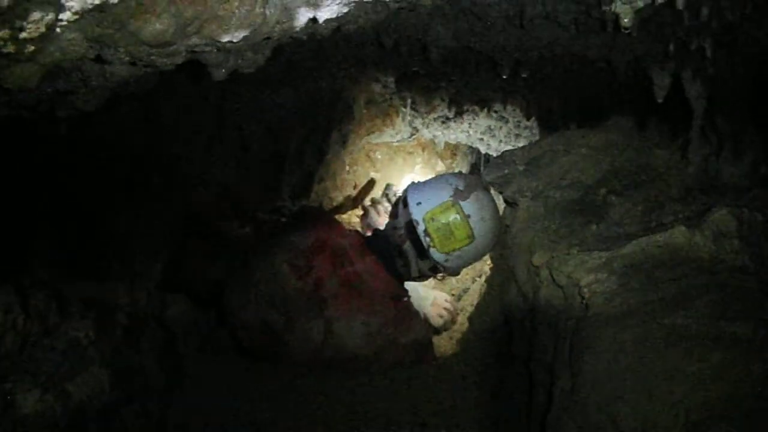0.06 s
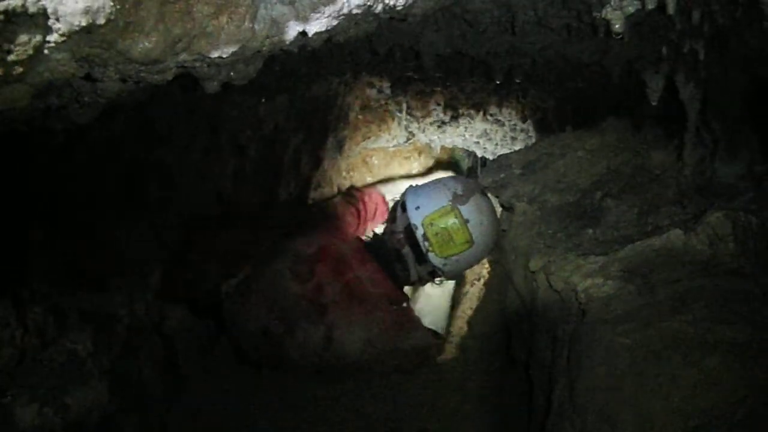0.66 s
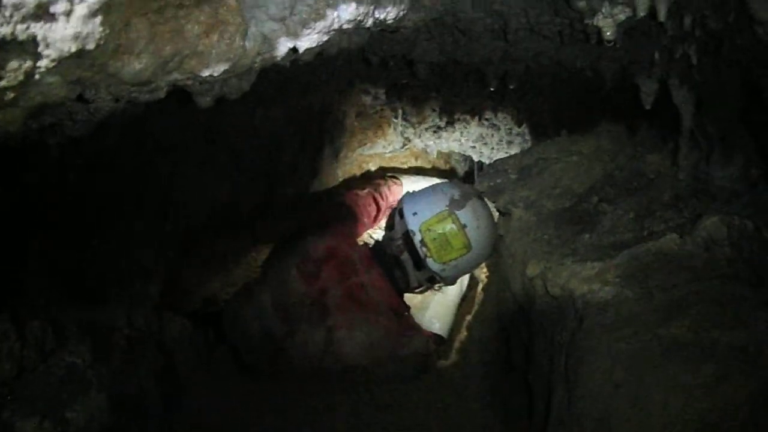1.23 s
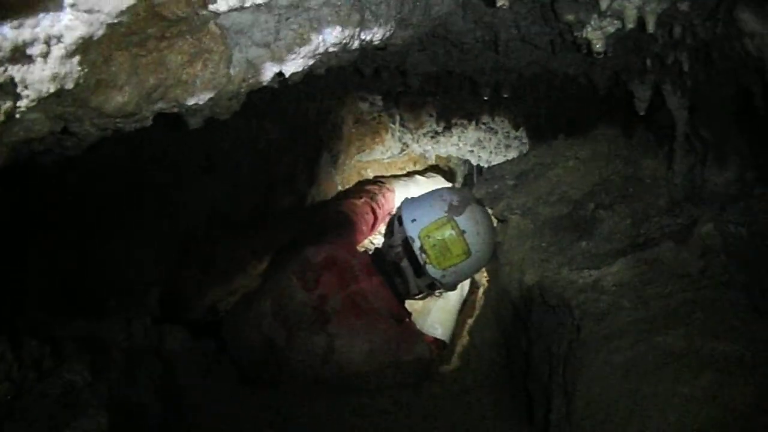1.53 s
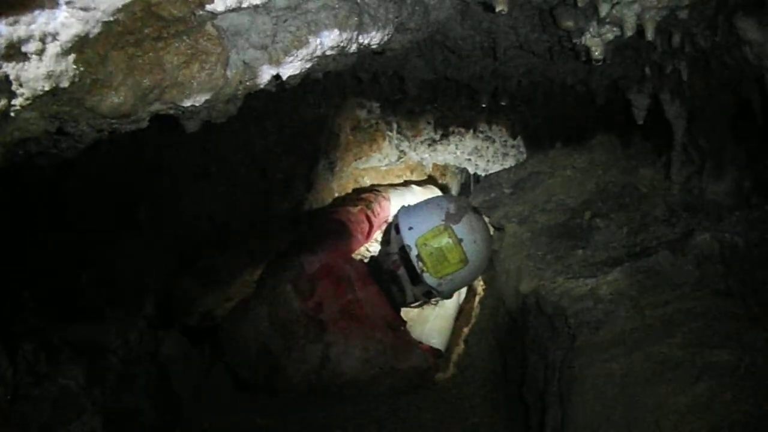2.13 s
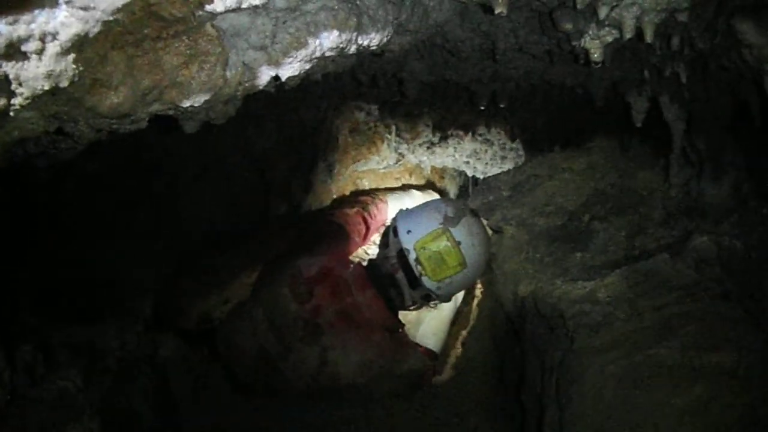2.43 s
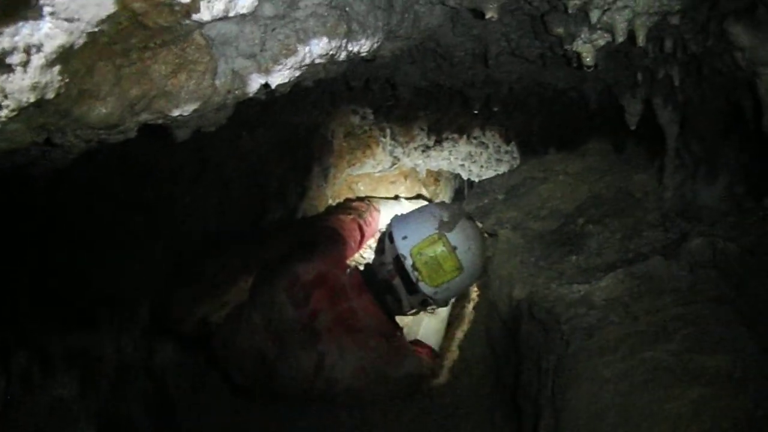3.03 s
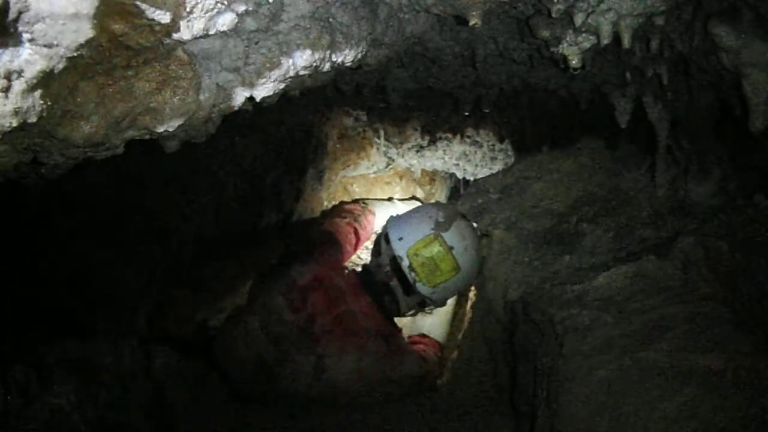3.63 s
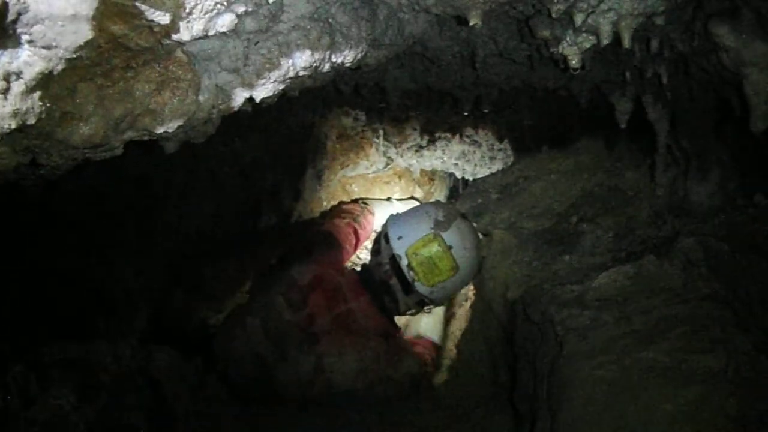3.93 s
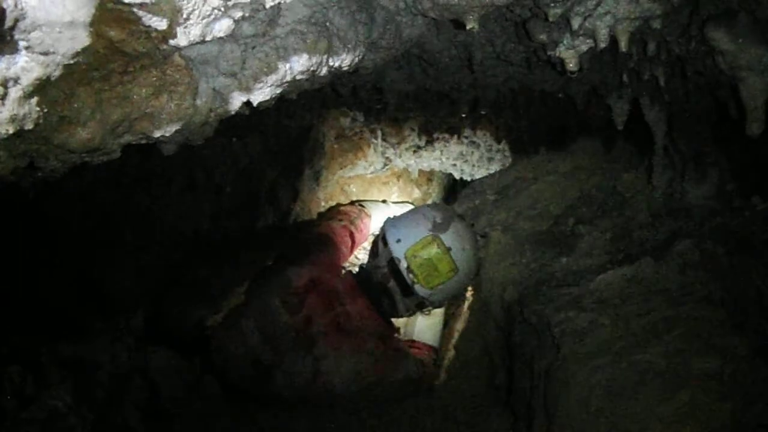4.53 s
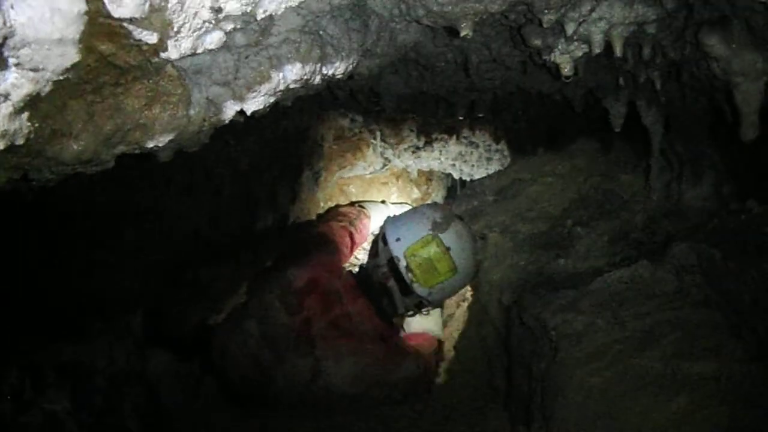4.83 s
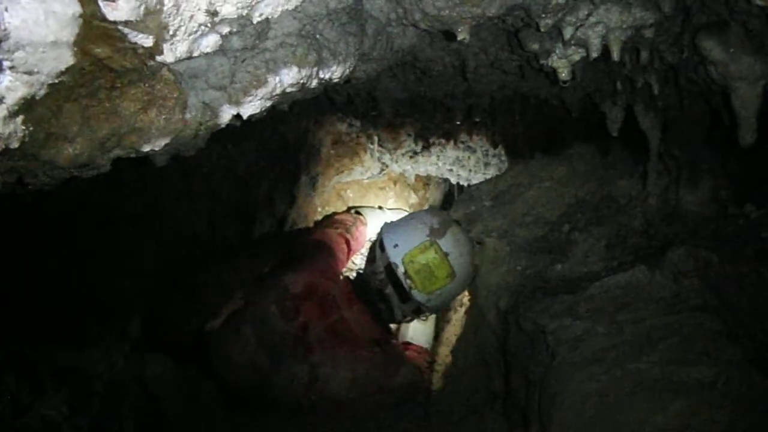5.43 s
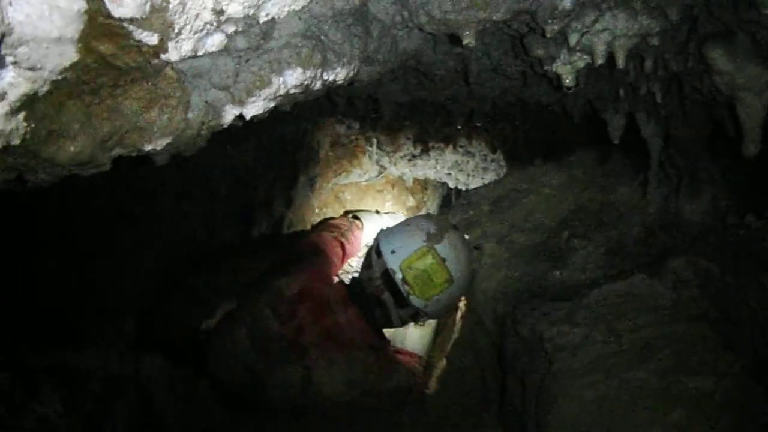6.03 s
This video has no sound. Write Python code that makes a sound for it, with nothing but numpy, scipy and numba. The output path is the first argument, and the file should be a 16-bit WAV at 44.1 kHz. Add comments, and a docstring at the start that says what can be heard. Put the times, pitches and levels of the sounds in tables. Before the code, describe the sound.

A hammer strikes a steel chisel seven times in a narrow cave, after light clinks and clothing rustle, over faint hiss.

```python
"""A hammer strikes a steel chisel seven times in a narrow limestone passage: the steel rings, the rock
cracks and thuds, and the close walls thicken every blow and boom briefly. Before that the caver shifts
his arms and sets the chisel on the rock with a few clinks; his suit rustles on each backswing.
The camera hisses and whines, overloads on the blows and turns its gain down after each."""
import sys
import numpy as np
from scipy import signal
from scipy.fft import rfft, irfft, next_fast_len
from scipy.io import wavfile
from scipy.ndimage import map_coordinates
from numba import njit

SR = 44100
rng = np.random.default_rng(int(sys.argv[2]) if len(sys.argv) > 2 else 0)


def dump(signal):
    """Clip the signal to [-1, 1] and save it as 16-bit WAV at the path in sys.argv[1]."""
    limited = np.clip(np.atleast_2d(signal).T, -1, 1)
    pcm = np.round(limited * 32767).astype(np.int16)
    wavfile.write(sys.argv[1], SR, pcm)


N = 276507
SHOT = 16384  # samples in a one-shot
AGE = np.arange(SHOT) / SR


def amp(db):
    """Decibels to gain."""
    return 10 ** (np.asarray(db) / 20)


def burst(x):
    """Scale each row to the energy of 20 ms at rms 1."""
    return x / np.sqrt(np.sum(x ** 2, axis=-1, keepdims=True) / (.02 * SR) + 1e-20)


def along(points, hz):
    """Read (Hz, value) breakpoints on a log axis."""
    f, v = np.transpose(points)
    return np.interp(np.log(hz + 1), np.log(f), v)


def wobble(rate):
    """A smooth random modulator with rate knots a second."""
    return map_coordinates(rng.standard_normal(1024), [np.arange(N) * rate / SR], mode="mirror")


def noise(spectrum):
    """Steady noise of rms 1 with this spectrum."""
    size = next_fast_len(N + 8192)
    eq = amp(along(spectrum, np.fft.rfftfreq(size, 1 / SR)))
    x = irfft(rfft(rng.standard_normal(size)) * eq, size)[:N]
    return x / np.sqrt(np.mean(x ** 2) + 1e-20)


def pulse(spectrum, tilt_db=0):
    """The tightest causal transient with this spectrum, tilted by tilt_db an octave."""
    hz = np.fft.rfftfreq(SHOT, 1 / SR)
    cepstrum = irfft(np.log(amp(along(spectrum, hz) + tilt_db * np.log2(1 + hz / 100))))
    cepstrum[1:SHOT // 2] *= 2  # fold to minimum phase
    cepstrum[SHOT // 2 + 1:] = 0
    return irfft(np.exp(rfft(cepstrum)))


def add(track, s, sound):
    """Drop a one-shot into the track at time s."""
    start = round(s * SR)
    track[start:start + SHOT] += sound[:N - start]


# the passage's tight reverb: (frequency [Hz], t60 [s])
PASSAGE_DECAY = [(60, 0.33), (170, 0.08), (430, 0.043), (700, 0.072), (1100, 0.01), (1700, 0.092),
                 (3000, 0.073), (6000, 0.053), (10000, 0.061), (15000, 0.047)]
def walls(x, build_s=.005, first_share=.85, crowd_s=0.01):
    """The wet signal: reflections crowd in and hold the level briefly, then the bass lingers."""
    hz, t, grains = signal.stft(rng.standard_normal(SHOT), SR, nperseg=128)
    fading_s = np.hypot(t, crowd_s) - crowd_s
    decay = amp(-60 * fading_s / along(PASSAGE_DECAY, hz)[:, None])
    tail = signal.istft(grains * decay, SR, nperseg=128)[1][:SHOT]
    tail *= 1 - (1 - first_share) * np.exp(-AGE / build_s)
    return burst(irfft(rfft(x, 2 * SHOT) * rfft(tail, 2 * SHOT))[..., :SHOT])


# EQ of the noise bed: (frequency [Hz], level [dB])
HISS_EQ = [(12, -29.5), (20, 0), (83, -1.5), (119, -4), (153, -5), (191, -6.5), (298, -8.5), (465, -9),
           (725, -13.5), (2330, -17.5), (3960, -17.5), (10200, -22.5), (11400, -17.5), (12400, -23.5),
           (15500, -24.5)]
# the camera's electronics: (pitch [Hz], rms level [dB], wander [Hz])
WHINES = [(7897, -67, 51), (11724, -53, 15), (15720, -73, 10)]
def hiss_and_whine(hiss_db=-43, waver_db=4.0, jitter_hz=36):
    """A bed of hiss and rumble, with thin wavering whines from the camera."""
    track = amp(hiss_db) * noise(HISS_EQ)
    for hz, db, wander_hz in WHINES:
        pitch = hz + wander_hz * wobble(26) + jitter_hz * wobble(240)
        level = amp(db + waver_db * wobble(170))
        track += level * np.sqrt(2) * np.sin(2 * np.pi * np.cumsum(pitch) / SR)
    return track


def swell(peak_s, rise_s, fall_s):
    """The speed of one arm movement: a bell with its own rise and fall."""
    t = np.arange(N) / SR - peak_s
    return np.exp(-.5 * (t / np.where(t < 0, rise_s, fall_s)) ** 2)


# EQ of rubbing cloth: (frequency [Hz], level [dB])
CLOTH_EQ = [(200, -43), (1500, -13), (2800, -1.5), (4700, 7.5), (6500, 0), (9500, 0.5), (12000, -13),
            (15500, -34)]
# the arms reach and settle: (time [s], level [dB], half length [s])
REACHES = [(0.098, -45, 0.069), (0.737, -38, 0.11), (1.105, -45, 0.11), (1.424, -45.5, .13),
           (2.1, -50, 0.28)]
def sleeves(fidget_db=-59.5, flutter_db=1.7, backswing_lead_s=0.052):
    """The suit, never quite still, rustles with the speed of the arms on each reach and backswing."""
    moves = [amp(db) * swell(s, half_s, half_s) for s, db, half_s in REACHES]
    moves += [amp(db) * swell(s - backswing_lead_s, rise_s=.14, fall_s=0.089) for s, *_, db in BLOWS]
    level = np.sqrt(amp(fidget_db) ** 2 + sum(move ** 2 for move in moves))
    return level * amp(flutter_db * wobble(45)) * noise(CLOTH_EQ)


# scuffs on the wall: (time [s], level [dB], t60 [s], brightness [dB/octave])
SCUFFS = [(0.082, -38, 0.091, -1), (.174, -37.5, 0.0072, -3.5), (1.113, -41, 0.048, 5),
          (3.710, -40, 0.035, -12), (3.775, -32, 0.029, 5.5), (3.793, -34, 0.021, 7.5),
          (5.156, -32.5, 0.021, 4.5), (6.118, -33.5, .03, 9)]
def scuffs(roughness=0.51):
    """Grit and cloth scrape the wall in short showers of grains."""
    track = np.zeros(N)
    for s, db, t60, tilt_db in SCUFFS:
        grains = rng.standard_normal(SHOT) * np.exp(roughness * rng.standard_normal(SHOT))
        scrape = signal.fftconvolve(grains * amp(-60 * AGE / t60), pulse(CLOTH_EQ, tilt_db))[:SHOT]
        add(track, s, amp(db) * walls(scrape))
    return track


def ring(hz, db, t60, direct_db=-14):
    """Struck steel modes, a mix of direct sound and wall reflections."""
    modes = np.sin(2 * np.pi * np.outer(hz, AGE)) * amp(-60 * AGE / np.reshape(t60, (-1, 1)))
    signs = rng.choice([-1, 1], len(hz))
    return burst((signs * amp(db)) @ (walls(modes) + amp(direct_db) * burst(modes)))


# the chisel's modes: (pitch [Hz], loose level [dB], seated level [dB], loose t60 [s])
CHISEL_MODES = [(1556, -17, -20.5, 0.13), (2725, -7, -13.5, 0.11), (4026, 3, -23.5, 0.12),
                (4194, 3, -13, 0.053), (4173, -2.5, -15.5, 0.07), (4547, -0.5, -8.5, 0.025),
                (4965, -8, -5, 0.038), (5467, -28.5, -4.5, 0.036), (5816, -25, -1, 0.064),
                (6173, -33, -8.5, 0.031), (7203, -2, -15, 0.11), (7575, 0, -7.5, 0.11),
                (8010, -29, -8, 0.091), (9350, -32, -12.5, .07), (10100, -32.5, -13.5, .07),
                (10370, -20.5, -17.5, .07), (13700, -23, -27, .04)]
# EQs of the stone's bright crack and low thud: (frequency [Hz], level [dB])
CRACK_EQ = [(200, -34), (700, -25.5), (1100, -32), (1600, -5), (2300, -9), (3100, 8.5), (3600, -4),
            (5000, 6.5), (7000, 1), (9500, -3.5), (12000, -12), (16000, -27.5)]
THUD_EQ = [(20, -27.5), (70, -15.5), (140, -3.5), (240, -8), (360, 0), (520, 3.5), (680, -13), (950, -10.5),
           (2500, -36.5)]
def clink(tilt_db, sustain, tick_db=-17, knock_db=-17, detune=0.0043):
    """Held loosely, the chisel rings on after a light touch; the grip shifts its notes a little."""
    hz, loose_db, _, t60 = np.transpose(CHISEL_MODES)
    notes = hz * (1 + detune * rng.standard_normal(len(hz)))
    steel = ring(notes, loose_db + tilt_db * np.log2(hz), sustain * t60, direct_db=-4)
    stone = amp(tick_db) * walls(pulse(CRACK_EQ)) + amp(knock_db) * walls(pulse(THUD_EQ))
    return steel + stone


# light touches: (time [s], level [dB], brightness [dB/octave], sustain [x loose t60],
# bounces [rounded count, none if negative])
TOUCHES = [(1.413, -45, -28, .6, 0), (1.523, -34.5, -3, 0.85, -0.5), (1.608, -38.5, -2, 2, 0),
           (1.7384, -20, -8.5, .35, 0), (1.886, -24.5, -6.5, 0.65, 3), (2.197, -44.5, -9, 0.42, -0.5),
           (2.382, -37, -8, 0.65, 1.5), (2.496, -45.5, -14, 0.42, -0.5), (3.708, -39.5, -17.5, .3, -1),
           (6.101, -44, -15, 0.55, -0.5)]
def setting_chisel(flight_shrink=0.81, bounce_loss_db=3):
    """The chisel touches stone or hammer; some touches set off ever quicker, weaker bounces."""
    track = np.zeros(N)
    for s, db, tilt_db, sustain, bounces in TOUCHES:
        add(track, s, amp(db) * clink(tilt_db, sustain))
        flight_s = .076 + .00092 * db  # a harder touch flies longer and lands louder
        bounce_db = -28.5 + 0.35 * db
        for k in range(round(bounces)):
            s += flight_s * flight_shrink ** k
            # clear of the stone it rings brightly
            add(track, s, amp(bounce_db - bounce_loss_db * k) * clink(tilt_db=3, sustain=0.59))
    return track


def thump(spectrum, tilt_db, wet_db):
    """One dull push and the passage's answer."""
    push = burst(pulse(spectrum, tilt_db))
    return burst(push + amp(wet_db) * walls(push))


# EQ of a body hit: (frequency [Hz], level [dB])
BUMP_EQ = [(20, -26), (70, -13), (100, -15.5), (140, 1), (220, -13.5), (500, -14.5), (1200, -37),
           (5000, -57.5)]
# body hits: (time [s], level [dB], brightness [dB/octave])
BUMPS = [(2.987, -44, -1), (3.032, -28, -7), (3.098, -38, -21.5), (3.707, -28, 1)]
def body_bumps():
    """The caver's body bumps softly against the rock."""
    track = np.zeros(N)
    for s, db, tilt_db in BUMPS:
        add(track, s, amp(db) * thump(BUMP_EQ, tilt_db, wet_db=6))
    return track


# the air standing between the walls: (pitch [Hz], level [dB], t60 [s])
AIR_MODES = [(123.4, -16, 0.78), (170, -12.5, 0.25), (216, -10, 0.44), (300, -6.5, 0.083),
             (408, -2.5, 0.26), (494, -10.5, .17)]
def rock_thud(rock_hz, knock_db=-2, knock_decay_s=0.011, boom_db=-6.5):
    """A blow's low end: the rock under the tip knocks at its own pitch and the passage's air booms on."""
    knock = burst(np.sin(2 * np.pi * rock_hz * AGE) * AGE * amp(-60 * AGE / knock_decay_s))
    boom = sum(rng.choice([-1, 1]) * amp(db - 60 * AGE / t60) * np.sin(2 * np.pi * hz * AGE)
               for hz, db, t60 in AIR_MODES)
    return thump(THUD_EQ, 0, wet_db=3) + amp(knock_db) * knock + amp(boom_db) * burst(boom)


# hammer blows; how the tip sits in the rock sets the bending note and which overtone sings out:
# (time [s], level [dB], seating [0-1], crack [dB], thud [dB], rock pitch [Hz], bend pitch [Hz],
# bend [dB], overtone pitch [Hz], overtone [dB], rebound delay [s, 0 for none], backswing rustle [dB])
BLOWS = [(3.4249, -2.5, 0.29, -7, -54, 484, 2886, -28.5, 4613, 1.5, 0.0054, -53.5),
         (3.8539, 3.5, 0.94, -7, -35, 450, 2888, -6, 5365, 10.5, 0.0094, -54.5),
         (4.37, 6, .87, 1.5, -22, 380, 3056, -6.5, 7370, -4.5, 0.000096, -50.5),
         (4.8242, 8, 0.95, -1, -25, 503, 3142, -13.5, 4790, -3.5, 0.00021, -44),
         (5.3125, 6, .85, 6.5, -18, 356, 3100, -7, 4020, -7.5, 0, -49),
         (5.7565, 5, 0.95, 3, -20.5, 597, 3120, -5, 6030, -2, 0.00035, -53),
         (6.2273, 8.5, 0.92, -6, -19.5, 900, 3162, 1, 5090, -2.5, 0.00096, -43)]
def hammering(pressed_t60=.022, bend_t60=0.052, overtone_t60=0.029, detune=0.0059, rebound_db=-5):
    """Each contact rings the chisel, cracks the stone and thuds; a glancing hammer lands twice."""
    track = np.zeros(N)
    hz, loose_db, seated_db, _ = np.transpose(CHISEL_MODES)
    pair = 1 + np.array([-0.014, 0.014])  # the bar is not quite round, so its notes come in close pairs
    for (s, db, seating, crack_db, thud_db, rock_hz, bend_hz, bend_db,
         overtone_hz, overtone_db, rebound_s, _) in BLOWS:
        mode_db = 10 * np.log10((1 - seating) * amp(loose_db) ** 2 + seating * amp(seated_db) ** 2)
        contacts = [(s, db), (s + rebound_s, db + rebound_db)] if rebound_s > 0 else [(s, db)]
        for contact_s, contact_db in contacts:
            # pressed to the rock, most of the steel's modes are choked at once
            steel = ring(hz * (1 + detune * rng.standard_normal(len(hz))), mode_db, pressed_t60)
            bend = amp(bend_db) * ring(bend_hz * pair, np.zeros(2), bend_t60)
            overtone = amp(overtone_db) * ring(overtone_hz * pair, np.zeros(2), overtone_t60)
            crack = amp(crack_db) * walls(pulse(CRACK_EQ))
            thud = amp(thud_db) * rock_thud(rock_hz)
            add(track, contact_s, amp(contact_db) * (steel + bend + overtone + crack + thud))
    return track


def scene():
    """The mono mix at the microphone."""
    return (hammering() + setting_chisel() + sleeves() + scuffs() + body_bumps() + hiss_and_whine())[None]


@njit
def gain_cut(level_db, limit_db=-6., depth_db=12.5, attack_db_per_s=1100, hold_s=.18, release_db_per_s=30):
    """The camera's gain reduction in dB: it grows during an overload, holds, then creeps back."""
    cut_db, now_db, held = np.zeros(len(level_db)), 0., 0
    for i in range(len(level_db)):
        held += 1
        if level_db[i] - now_db > limit_db:
            now_db = min(now_db + attack_db_per_s / SR, depth_db)
            held = 0
        elif held > hold_s * SR:
            now_db = max(now_db - release_db_per_s / SR, 0.)
        cut_db[i] = now_db
    return cut_db


def record(dry, top_hz=15850):
    """The gain ducks too slowly for the blows, so their attacks distort; a steep low-pass follows."""
    level_db = 20 * np.log10(np.abs(dry[0]) + 1e-9)
    ducked = dry * amp(-gain_cut(level_db))
    oversampled = signal.resample_poly(ducked, 2, 1, axis=1)
    saturated = oversampled / (1 + oversampled ** 12) ** (1 / 12)
    crunch = signal.resample_poly(saturated, 1, 2, axis=1)
    size = next_fast_len(N + 8192)
    band = np.clip((top_hz - np.fft.rfftfreq(size, 1 / SR)) / 500 + .5, 0, 1)
    return irfft(rfft(crunch, size) * np.sin(band * np.pi / 2) ** 2, size)[:, :N]


dry = scene()
out = record(dry)
dump(out)
```